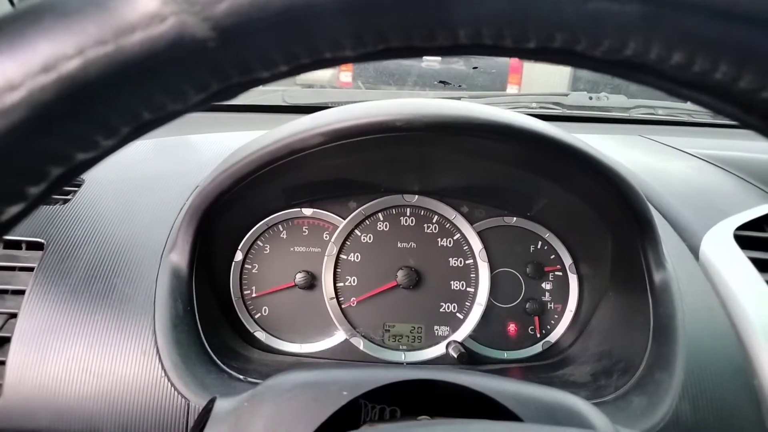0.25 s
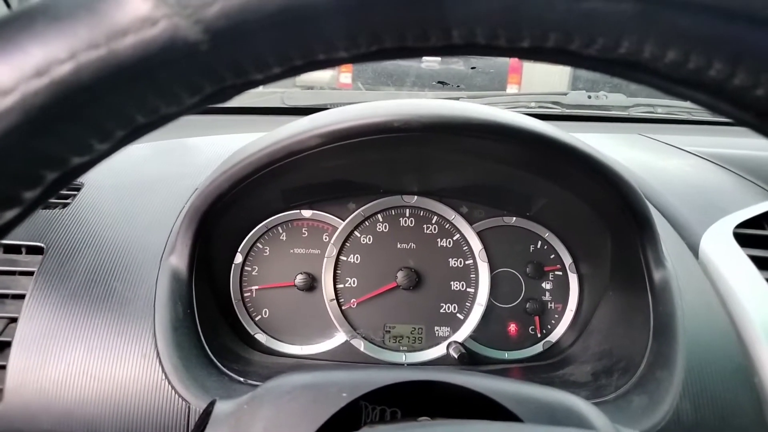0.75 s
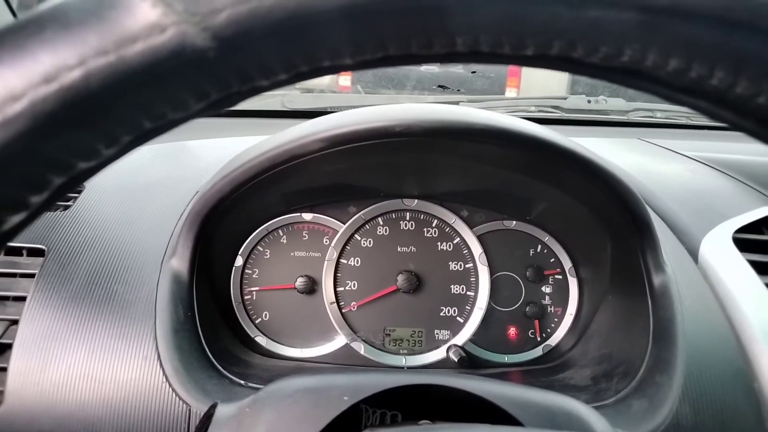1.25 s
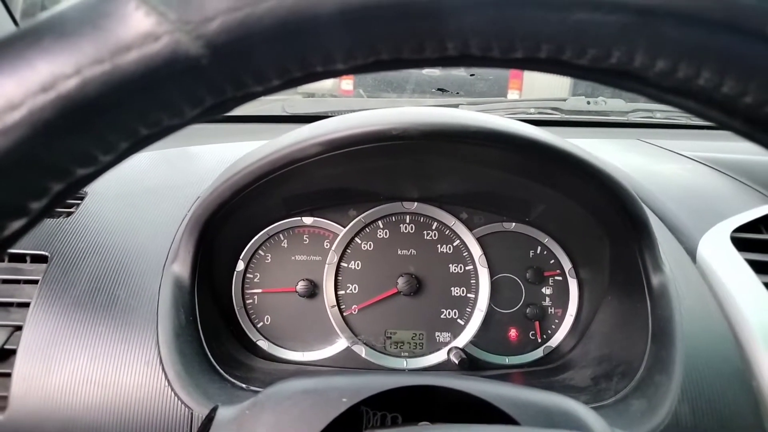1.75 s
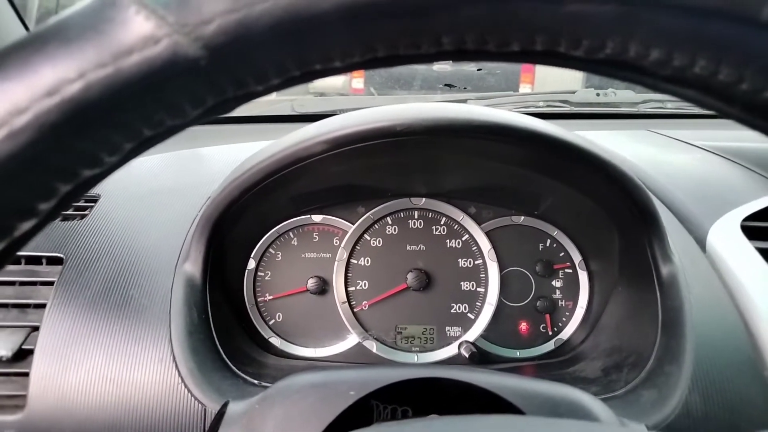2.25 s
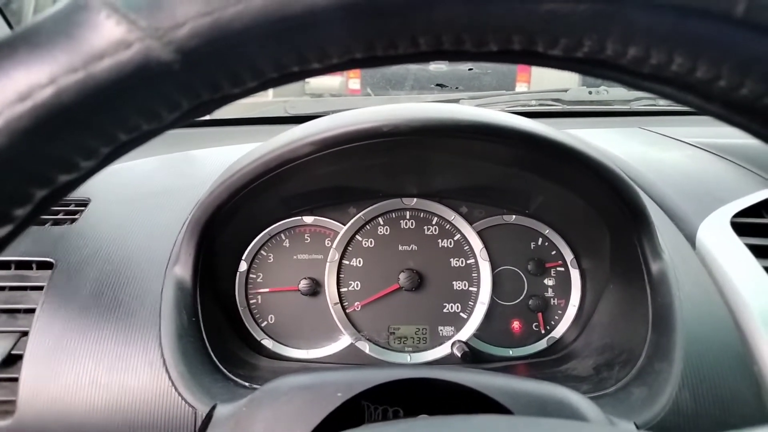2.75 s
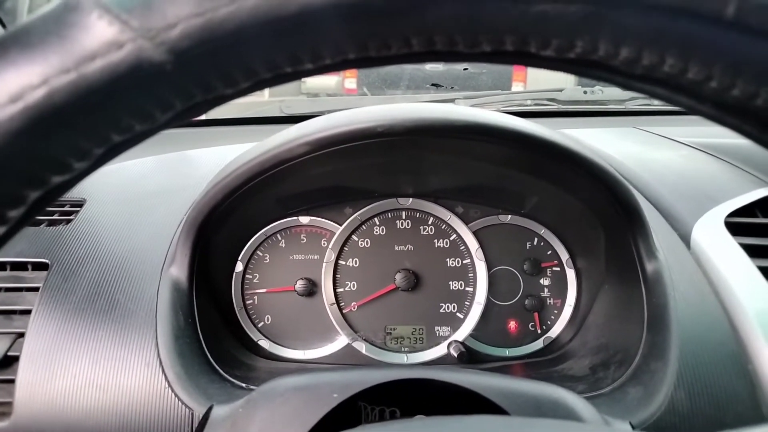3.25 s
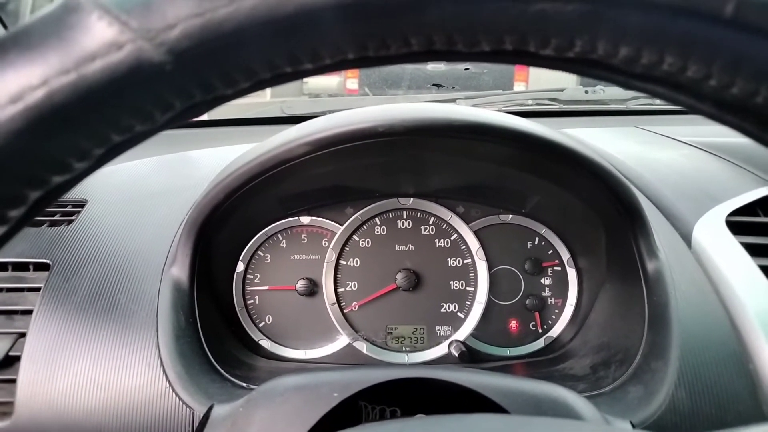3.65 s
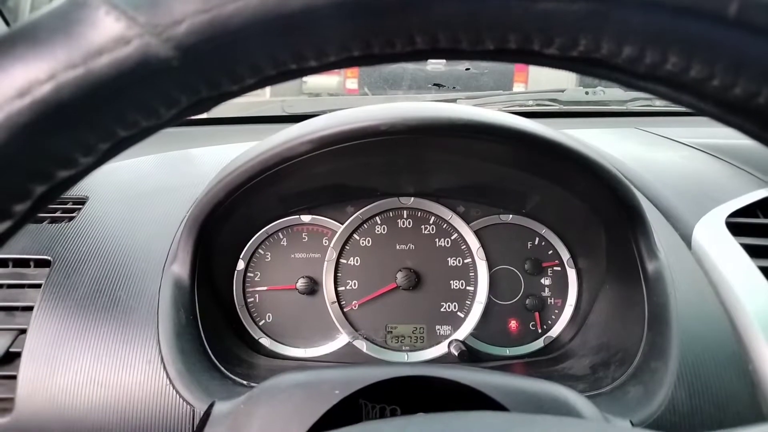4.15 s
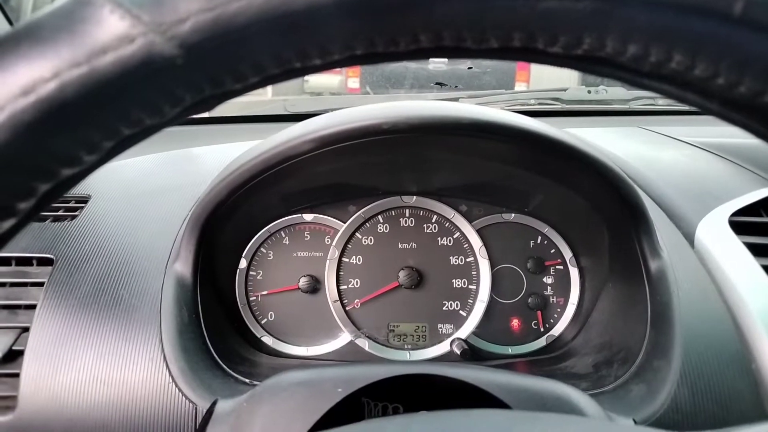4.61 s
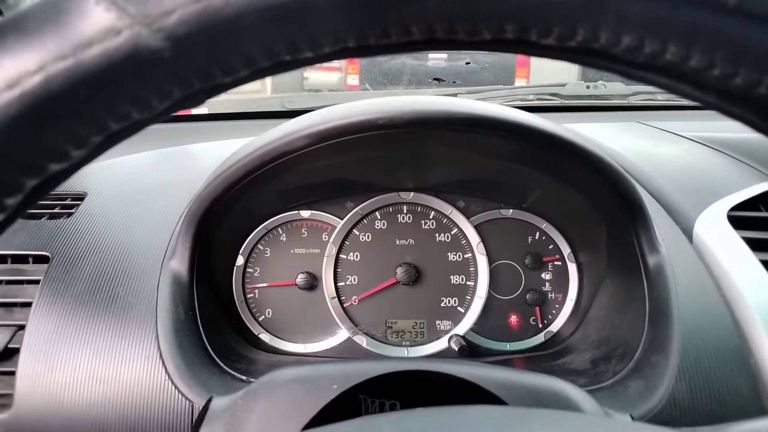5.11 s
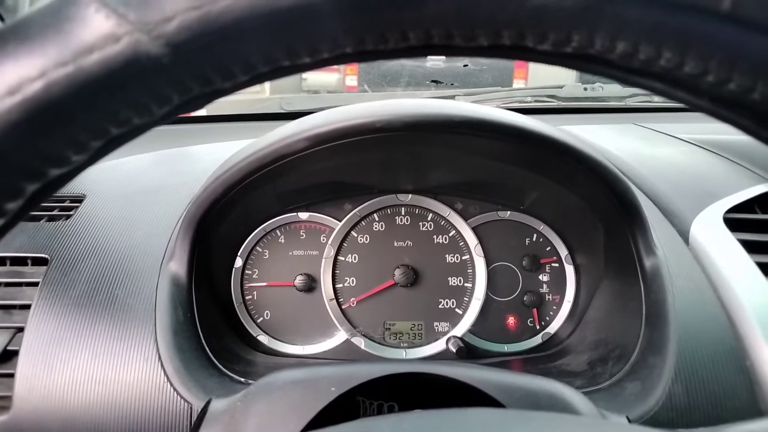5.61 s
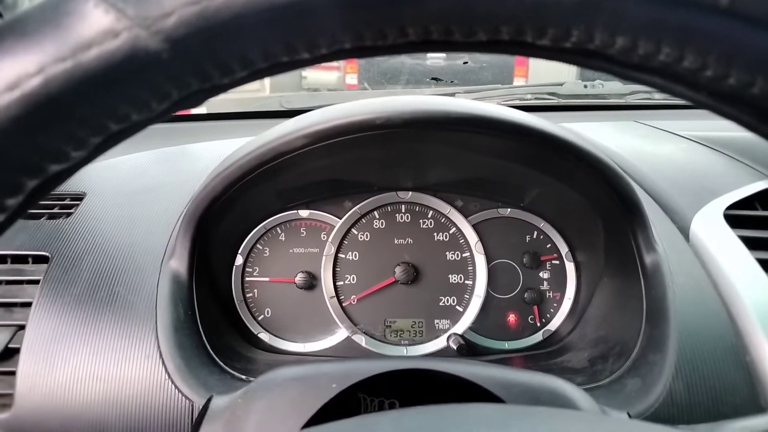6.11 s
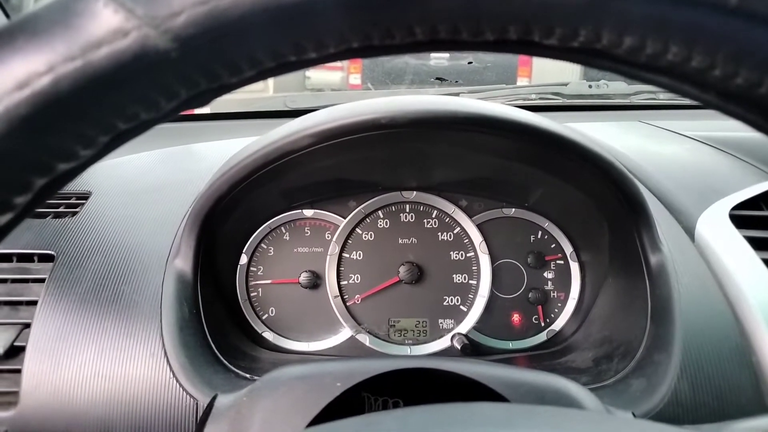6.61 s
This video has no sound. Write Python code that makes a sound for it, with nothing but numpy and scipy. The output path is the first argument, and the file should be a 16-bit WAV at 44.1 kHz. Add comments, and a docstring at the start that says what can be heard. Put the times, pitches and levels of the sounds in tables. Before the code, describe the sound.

A four-cylinder diesel pickup is already running, parked and heard from the driver's seat as a low, shaking rumble. It revs up almost at once, peaking around 0.6 seconds, then again, higher, around 1.4 seconds. After sinking toward idle, it rises at 2.2 seconds and again at 3 seconds, easing off near 3.7. A slower, longer rev builds in two steps from 4.3 to 6 seconds, followed by one thin, faint turbo whistle at about 6.2. A last quick rev runs from 6.3 to 6.8 seconds and starts to drop. Each climb brings metallic clatter, hard knocks and brief spits of hiss, strongest around 3.3, 4.9 and 6.4 seconds. Near the top of each rev the cab booms, a panel rings and the trim buzzes lightly. As the revs fall, the clatter softens and gears whine faintly.

```python
"""A four-cylinder diesel pickup, parked, revs up from idle in six blips, heard from the driver's seat.
The firings rumble through the bulkhead and shake the cab, whose air booms near the top of each blip.
The block clatters and hisses under fuel, one cylinder knocking hard as the revs pick up.
A panel rings with the load, trim buzzes, and gears whine faintly as the revs fall.
The turbo gives one thin whistle after the longest blip."""
import sys
import numpy as np
from scipy import signal
from scipy.fft import rfft, irfft
from scipy.io import wavfile
from scipy.ndimage import uniform_filter1d

SR = 44100
rng = np.random.default_rng(int(sys.argv[2]) if len(sys.argv) > 2 else 0)


def pcm_store(signal):
    """Save signal as 16-bit PCM."""
    levels = np.round(np.clip(np.atleast_2d(signal), -1, 1) * 32767)
    wavfile.write(sys.argv[1], SR, levels.astype(np.int16).T)


N = 302967

# Presses of the pedal; the long fifth blip takes two rows.
# Each row: down in seconds, up in seconds, depth from 0 to 1, added clatter in dB if held down.
PEDAL_PRESSES = [(0.14, 0.519, 0.8, 10.5), (0.922, 1.338, 0.97, 15.5), (2.199, 2.763, 0.82, 14),
                 (3.03, 3.732, 0.72, 12.5), (4.325, 5.156, .48, 9.5), (5.0, 5.945, 0.6, 12),
                 (6.263, 6.759, 0.96, 15)]
# Resonances of the engine block. Each row: centre in Hz, width in Hz, lift in dB.
BLOCK_MODES = [(738, 45, 4), (1561, 60, 2), (1734, 50, 2.5), (1891, 60, 2.5), (2224, 70, 3), (2335, 60, 3),
               (2883, 70, 2), (3298, 50, 3), (3792, 50, 3.5), (6040, 70, 4)]


def engine(idle_hz=26.9, full_pedal_rise_hz=61.4, flywheel_s=0.296):
    """Fuel spins up the flywheel, friction drags it back. Gives firing rate, fuel and added clatter."""
    _, _, depth, clatter_db = np.transpose(PEDAL_PRESSES)
    fuel = np.max(depth[:, None] * pedal(rise_s=0.398, fall_s=0.203), axis=0)
    # combustion turns hard soon after the pedal goes down
    harsh_db = np.max(clatter_db[:, None] * pedal(rise_s=0.19, fall_s=0.43, delay_s=0.0037), axis=0)
    inertia = np.exp(-1 / (flywheel_s * SR))
    revs = signal.lfilter([1 - inertia], [1, -inertia], fuel)
    return idle_hz + full_pedal_rise_hz * revs, fuel, harsh_db


def pedal(rise_s, fall_s, delay_s=0):
    """One envelope for each press: it builds while the pedal is down and dies after it lifts."""
    t = np.arange(N) / SR - delay_s
    envelopes = []
    for down, up, _, _ in PEDAL_PRESSES:
        build = 1 - np.exp(-np.clip(t - down, 0, up - down) / rise_s)
        envelopes.append(build * np.exp(-np.maximum(t - up, 0) / fall_s))
    return np.array(envelopes)


def coasting():
    """Seconds since the pedal lifted, counted only in the gaps between presses."""
    t = np.arange(N) / SR
    downs, ups, _, _ = np.transpose(PEDAL_PRESSES)
    since = sum((t > up) * (t < down) * (t - up) for up, down in zip(ups, downs[1:]))
    return uniform_filter1d(since, size=4000)


def firings(cycles, scatter_db, cylinders_db=(0, 0, 0, 0)):
    """One blow per cycle, the four cylinders in turn: its sample, cylinder and uneven strength."""
    at = np.flatnonzero(np.diff(np.floor(cycles))) + 1
    cylinder = np.arange(len(at)) % 4
    chance = rng.standard_normal(1000)[:len(at)]
    return at, cylinder, undb(np.array(cylinders_db)[cylinder] + scatter_db * chance)


def rumble(cycles, level_db, gas_db=-3):
    """Each cylinder thumps the bulkhead by its own path; turbulent gas follows each thump."""
    # Weight of each cylinder's thump in dB.
    cylinders_db = [0.84, -0.53, 0.26, 0.35]
    # Tone of the rumble. Each row: frequency in Hz, gain in dB.
    rumble_eq = [(20, -5.5), (45, -10.5), (75, -8), (110, 0), (138, 8.5), (165, -2.5), (200, 4),
                 (250, -4.5), (400, -6), (600, -10), (800, -13.5), (950, -27), (1300, -35.5), (2500, -61.5)]
    # Resonances of the bulkhead. Each row: centre in Hz, width in Hz, lift in dB.
    bulkhead_modes = [(327, 2.8, 5.5), (734, 29, 4)]
    at, cylinder, size = firings(cycles, scatter_db=1.86, cylinders_db=cylinders_db)
    hits = np.zeros((4, N))
    hits[cylinder, at] = size
    thumps = np.array([sum(smear(row, t60=0.1295) for row in hits) for _ in range(2)])
    gas = bursts(at, size, decay_s=0.083, rise_s=0.014) * rng.standard_normal((2, N))
    pair = thumps / thumps.std() + undb(gas_db) * gas / gas.std()
    return steady(spread(*colour(pair, rumble_eq, bulkhead_modes), pan_db=-0.2)) * undb(level_db)


def shake(cycles, hz, rough=0.31, lope=0.079):
    """The engine rocks unevenly on its mounts; each harmonic swells where the cab takes it up."""
    # The cab's response. Each row: firing rate in Hz, then levels of harmonics one to three in dB.
    cab_response = [(26.8, -28.5, -36, -46.5), (34.2, -31, -48, -36), (42.6, -25, -35.5, -31.5),
                    (49.05, -26.5, -27.5, -34), (50.6, -35, -23.5, -22), (51.45, -26.5, -26.5, -47.5),
                    (57, -34, -38.5, -54)]
    rates, *levels = np.transpose(cab_response)
    out = 0
    for order, db in enumerate(levels, 1):
        sway = 1 + lope * np.cos(np.pi * cycles / 2 + order) + rough * order ** 0.76 * flutter(26) / 2
        tone = np.exp(2j * np.pi * order * cycles)
        out = out + undb(np.interp(hz, rates, db)) * (sway * tone).imag
    return np.sqrt(2) * out * undb([[-0.3], [0.3]])


def boom(cycles, hz, coast_s, drive_ratio=2.68, lag_s=0.008, build_s=0.015):
    """A belt-driven part, likely the fan, sets the cab's air booming; it trails the revs and throbs."""
    # The cab's air resonance. Each row: pitch in Hz, level in dB.
    air_response = [(70, -48), (100, -43), (118, -34), (125, -30), (133, -19.5), (141, -15), (149, -16),
                    (160, -29)]
    throb, rough, swell_db = 0.3, 0.11, 1.2
    overtone_db, coast_db_per_s = -20.5, 1
    t = np.arange(N) / SR
    pitch = drive_ratio * np.interp(t - lag_s, t, hz)
    trailing_pitch = np.interp(t - build_s, t, pitch)
    resonance_db = np.interp(trailing_pitch, *np.transpose(air_response))
    db = resonance_db + swell_db * walk(22) + coast_db_per_s * coast_s
    tone = np.exp(2j * np.pi * np.cumsum(pitch) / SR)
    sway = 1 + throb * np.sin(np.pi * cycles / 2) + rough * flutter(60)
    return np.sqrt(2) * undb(db) * ((tone + undb(overtone_db) * tone ** 2) * sway).real


def clatter(cycles, block_db, hiss_db, harsh_db, hiss_floor_db=-56.5):
    """Combustion rings the block; valves and injectors tick between the firings."""
    # Weight of each cylinder's clatter in dB.
    cylinders_db = [-1, 1.6, -1.1, 1.3]
    # Tone of the block and of the hiss. Each row: frequency in Hz, gain in dB.
    block_eq = [(300, -22), (700, 8), (1000, 11), (1350, 5.5), (1700, 6.5), (2400, 1), (3000, -5.5),
                (3900, -8), (4500, -21.5), (6000, -20), (9000, -45)]
    hiss_eq = [(2000, 1.5), (4000, 8.5), (4900, 3.5), (6000, 3), (7200, 1), (7700, -4.5), (8200, -17.5),
               (11000, -11.5), (15500, -18.5)]
    at, cylinder, size = firings(cycles, scatter_db=2, cylinders_db=cylinders_db)
    pistons = piston_slap(at, cylinder, size) * undb(-25 + 1.6 * harsh_db)  # hard only under load
    combustion = bursts(at, size, decay_s=0.048, rise_s=0.008)
    at, _, size = firings(3 * cycles, scatter_db=3)
    valves = bursts(at, size, decay_s=0.007, rise_s=0.002)
    at, _, size = firings(2 * cycles, scatter_db=4.5)
    injectors = bursts(at, size, decay_s=0.026, rise_s=0.0066)
    grain = undb(0.39 * walk(820))  # each blow is a cluster of tiny metal contacts
    rattle = np.hypot(combustion, 0.81 * valves) * grain * rng.standard_normal((2, N))
    hiss = np.hypot(combustion, 0.55 * injectors) * rng.standard_normal((2, N))
    block = rattle / rattle.std() + pistons
    block = steady(spread(*colour(block, block_eq, BLOCK_MODES), pan_db=2.5))
    hiss = steady(spread(*colour(hiss, hiss_eq, BLOCK_MODES), pan_db=-0.5))
    hiss_gain = np.hypot(undb(hiss_db), undb(hiss_floor_db))
    return treble_flicker(block * undb(block_db) + hiss * hiss_gain, t60=0.057, wet_db=1)


def piston_slap(at, cylinder, size, jitter_s=0.0004):
    """Each piston strikes the block with its own metallic clack, a little early or late each time."""
    slip = (jitter_s * SR * rng.standard_normal(1000)[:len(at)]).astype(int)
    hits = np.zeros((4, N))
    hits[cylinder, np.clip(at + slip, 0, N - 1)] = size
    return steady(np.array([sum(smear(row, t60=0.08) for row in hits) for _ in range(2)]))


def knocks(rise_s=0.0067, hold_s=0.015):
    """A big shot of fuel at low revs burns all at once and rattles the engine bay."""
    # Hard combustion knocks. Each row: time in seconds, relative level in dB, decay in seconds.
    cues = [(0.237, -54, .015), (0.3, -40, 0.0072), (0.478, -45, 0.033), (0.525, -31.5, 0.041),
            (0.582, -48, .03), (0.624, -45, .025), (0.986, -39.5, .03), (1.122, -39, .02),
            (1.144, -49, .015), (1.171, -47, .015), (1.208, -39.5, .02), (1.27, -39, 0.02),
            (1.308, -45, 0.015), (2.155, -39, 0.028), (2.401, -49, .025), (2.48, -38, 0.031),
            (2.594, -49, .025), (2.694, -35.5, .025), (3.22, -34.5, 0.026), (3.31, -30.5, 0.025),
            (3.399, -34, 0.024), (3.483, -36, 0.029), (3.57, -39, .02), (4.631, -35.5, .022),
            (4.745, -42, .025), (4.828, -28.5, 0.025), (4.922, -32, 0.022), (5.01, -34.5, 0.028),
            (5.095, -41, .025), (5.345, -46, 0.023), (5.436, -37, 0.029), (5.512, -38, .028),
            (5.645, -36, .028), (5.737, -37, .028), (6.357, -43, .025), (6.431, -30.5, .026),
            (6.525, -34.5, .028), (6.635, -49, .025), (6.82, -33.5, 0.033)]
    # Tone of a knock. Each row: frequency in Hz, gain in dB.
    knock_eq = [(200, -2), (500, 5), (740, 7), (900, 4), (1200, 5.5), (1700, 5), (2500, 1.5), (3100, 1),
                (3850, 0.5), (4400, -17), (6200, -15), (7400, -19), (8300, -35), (12300, -30), (15000, -42)]
    force = sum(undb(db) * blow(s - 0.005, rise_s, decay_s, hold_s) for s, db, decay_s in cues)
    rattle = steady(spread(*colour(rng.standard_normal((2, N)), knock_eq, BLOCK_MODES), pan_db=2))
    contacts = undb(1.7 * walk(560) + 1.7)
    return treble_flicker(rattle * force * contacts, t60=0.031, wet_db=-0.5)


def body(octaves, harsh_db):
    """The body shudders at any speed; a bulkhead panel rings out as the engine pulls."""
    shudder = ringing(hz=83.8, width_hz=30.6) * undb(-33 + 5 * octaves)
    panel = steady(ringing(hz=741.5, width_hz=58))
    return shudder + panel * undb(-51.5 - 1.5 * octaves + 0.99 * harsh_db)


def growl(cycles, octaves, rough=0.67, db_per_octave=16.5):
    """Upper firing harmonics stand clear of the rumble as the revs near their top."""
    # Levels of harmonics five to ten at middling revs, in dB.
    harmonics_db = [-47, -46.5, -50.5, -48.5, -46, -47.5]
    pair = np.zeros((2, N))
    for channel in pair:
        for order, db in enumerate(harmonics_db, 5):
            tone = np.exp(2j * np.pi * order * cycles)
            channel += undb(db) * (tone * (1 + rough * flutter(14))).real
    return spread(*pair) * undb(db_per_octave * octaves)


def trim_buzz(cycles, hz, order=6, ring_hz=335, width_hz=35, rough=0.83, db=-37):
    """A trim panel picks up the sixth firing harmonic near the top of each blip."""
    tone = np.exp(2j * np.pi * order * cycles) / (1 + 2j * (order * hz - ring_hz) / width_hz)
    pair = [(tone * (1 + rough * flutter(40))).real for _ in range(2)]
    return spread(*pair) * undb(db)


def spits():
    """Brief bright spits of hiss."""
    # Each row: time in seconds, level in dB, band centre in Hz.
    cues = [(0.42, -48, 6200), (0.497, -43, 6400), (1.262, -42, 6260), (2.154, -39.5, 5756),
            (2.70, -42, 6270), (3.312, -38, 6640), (3.314, -50, 12010), (3.396, -35.5, 6400),
            (3.56, -40, 5800), (4.755, -46, 5914), (4.83, -40, 6200), (4.922, -38.5, 6150),
            (5.34, -45, 5700), (5.505, -41, 5798), (5.586, -42, 5740), (5.669, -39.5, 5898),
            (5.754, -43.5, 5900), (6.332, -51, 5948), (6.815, -38, 5600), (6.85, -42, 5500)]
    out = 0
    for s, db, hz in cues:
        band = signal.butter(2, [hz * 0.9, hz * 1.083], "bandpass", fs=SR, output="sos")
        air = signal.sosfilt(band, rng.standard_normal((2, N)))
        out = out + air / air.std() * undb(db) * blow(s - 0.002, rise_s=0.012, decay_s=0.032)
    return out


def gear_whine(cycles, hz, teeth=44, ring_hz=2290, width_hz=300, db=-43):
    """Timing gears mesh 44 times a firing; as the revs fall they go slack and ring their cover."""
    mesh = np.exp(2j * np.pi * teeth * cycles)
    gears = np.array([(mesh * (0.6 + 0.9 * flutter(130))).real for _ in range(2)])
    slack = uniform_filter1d((np.gradient(hz) < 0).astype(float), size=3000)
    cover = 1 / (1 + (2 * (teeth * hz - ring_hz) / width_hz) ** 2)
    return gears * undb(db) * slack * cover


def turbo(peak_s=6.205, rise_s=0.077, fall_s=0.035, hz=6814, sag_hz_per_s=960, db=-47):
    """The turbo winds down: a thin whistle that swells, sags in pitch and fades."""
    age = np.arange(N) / SR - peak_s
    pitch = hz - sag_hz_per_s * np.clip(age, -0.5, 0.5)
    swell = np.exp(-(age / np.where(age < 0, rise_s, fall_s)) ** 2 / 2)
    return undb(db) * swell * np.sin(2 * np.pi * np.cumsum(pitch) / SR + 0.7 * walk(190))


def bursts(at, size, decay_s, rise_s):
    """An envelope that swells at each blow and dies away."""
    blows = np.zeros(N)
    blows[at] = size ** 2
    blows[0] = 0.8  # the engine is already running
    power = signal.lfilter([1], [1, -np.exp(-2 / (decay_s * SR))], blows + 1e-18)
    return np.sqrt(np.abs(uniform_filter1d(power, int(rise_s * SR) + 1)))


def blow(start, rise_s, decay_s, hold_s=0):
    """A swell, a short hold and an exponential fall, peak 1."""
    age = np.maximum(np.arange(N) / SR - start, 0)
    return np.minimum(age / rise_s, 1) * np.exp(-np.maximum(age - rise_s - hold_s, 0) / decay_s)


def ringing(hz, width_hz):
    """One resonance of the body, shaken at random; unit level."""
    band = signal.butter(2, [hz - width_hz / 2, hz + width_hz / 2], "bandpass", fs=SR, output="sos")
    pair = spread(*signal.sosfilt(band, rng.standard_normal((2, N))))
    return pair / pair.mean(0).std()


def colour(x, eq, modes=()):
    """Filter by a smooth EQ curve with resonances standing on it."""
    f = np.arange(N // 2 + 1) * SR / N + 1
    hz, db = np.transpose(eq)
    gain_db = np.interp(np.log(f), np.log(hz), db)
    for centre, width, lift in modes:
        gain_db = gain_db + lift / (1 + (2 * (f - centre) / width) ** 2)
    return irfft(rfft(x) * undb(gain_db), N)


def smear(x, t60):
    """Many short paths through metal and cab smear each pulse without colouring it."""
    t = np.arange(SR // 4) / SR
    paths = rfft(rng.standard_normal(len(t)) * np.exp(-np.log(1000) * t / t60), N)
    return irfft(rfft(x) * paths / np.abs(paths), N)


def treble_flicker(pair, t60, wet_db, count=3, treble_hz=2200):
    """Narrow peaks in the treble flicker, fading and returning."""
    t = np.arange(SR // 8) / SR
    tails = rng.standard_normal((count, len(t))) * np.exp(-np.log(1000) * t / t60)
    filters = rfft(tails / np.sqrt(np.sum(tails ** 2, axis=1, keepdims=True)), N)
    mix = np.array([walk(14) for _ in filters])
    mix = mix / np.sqrt(np.sum(mix ** 2, axis=0))
    f = np.arange(N // 2 + 1) * SR / N
    wet = undb(wet_db) * np.clip(f / treble_hz, 0, 1) ** 2
    plain = rfft(pair) / np.hypot(1, wet)
    flicker = sum(share * irfft(plain * wet * peaks, N) for share, peaks in zip(mix, filters))
    return irfft(plain, N) + flicker


def spread(mid, side, pan_db=0):
    """Left and right: alike in the bass, unrelated in the treble; the sound reaches the left first."""
    # Stereo width at the driver's seat. Each row: frequency in Hz, side against mid in dB.
    width_eq = [(50, -20.5), (140, -37), (220, -28), (380, -12.5), (700, -14), (1300, -5.5), (2000, -2.5),
                (2800, -0.5), (15000, 1)]
    side = colour(side, width_eq)
    right = np.roll(mid - side, 16)
    return np.array([mid + side, right]) * undb([[pan_db / 2], [-pan_db / 2]])


def steady(pair):
    """Ride the gain to hold the middle at unit level, whatever the firing rate."""
    return pair / np.sqrt(uniform_filter1d(pair.mean(0) ** 2, size=8000) + 1e-12)


def walk(rate):
    """Random levels held 1 / rate s and slewed twice; spread near 1."""
    hold = int(SR / rate)
    steps = np.repeat(rng.standard_normal(N // hold + 1), hold)
    return 1.3 * uniform_filter1d(uniform_filter1d(steps, hold), hold)[:N]


def flutter(rate):
    """A complex random wobble that roughens a tone's level and phase."""
    return walk(rate) + 1j * walk(rate)


def undb(db):
    """Decibels to gain."""
    return 10 ** (np.asarray(db) / 20)


def scene():
    """The crank times the engine and cab; revs and load set levels. Knocks, spits and turbo are cued."""
    hz, fuel, harsh_db = engine()
    cycles = np.cumsum(hz) / SR  # counted in firings
    octaves = np.log2(hz / 45)  # above middling revs, 45 firings a second
    coast_s = coasting()
    rumble_db = -28.5 + 11 * octaves + 4.5 * fuel - 3 * coast_s
    block_db = -46 + 0.5 * octaves + harsh_db - 6 * coast_s
    hiss_db = -55.5 + octaves + 0.87 * harsh_db - 20 * coast_s
    cab = shake(cycles, hz) + boom(cycles, hz, coast_s) + trim_buzz(cycles, hz) + body(octaves, harsh_db)
    motor = rumble(cycles, rumble_db) + growl(cycles, octaves)
    metal = clatter(cycles, block_db, hiss_db, harsh_db) + knocks()
    return cab + motor + metal + spits() + gear_whine(cycles, hz) + turbo()


def record(dry):
    """A steep low-pass cuts the treble above 15.5 kHz."""
    return signal.sosfilt(signal.ellip(8, 0.2, 70, 15500, fs=SR, output="sos"), dry)


dry = scene()
out = record(dry)
pcm_store(out)
```